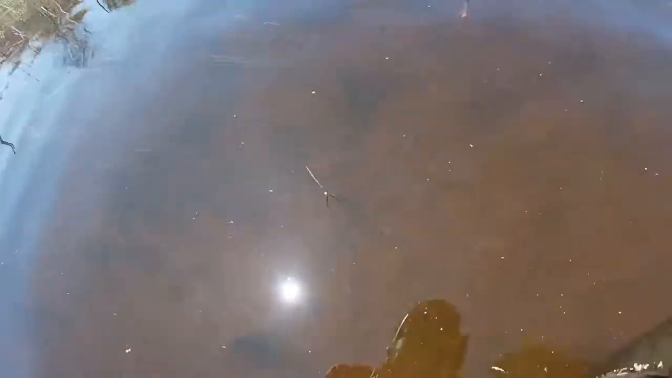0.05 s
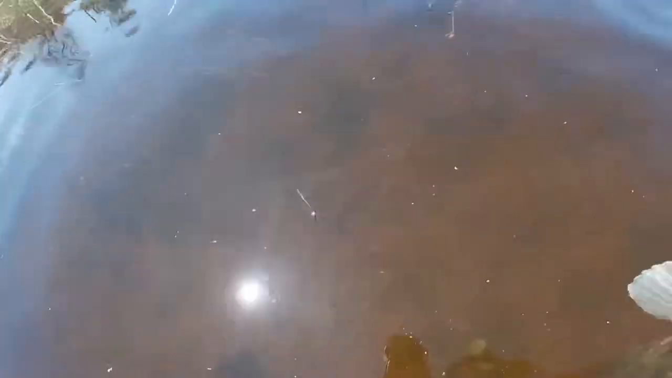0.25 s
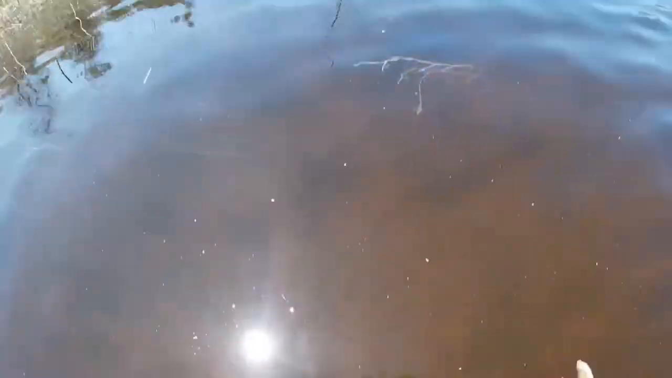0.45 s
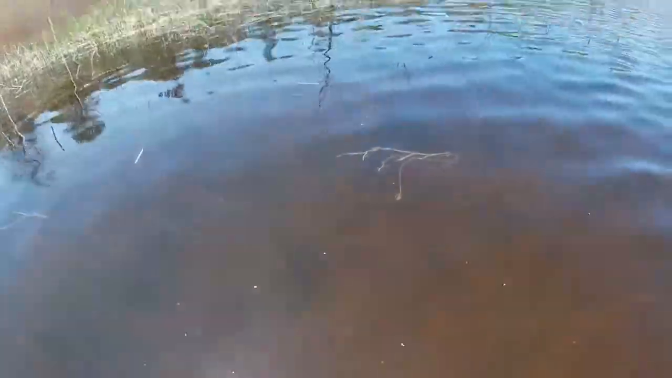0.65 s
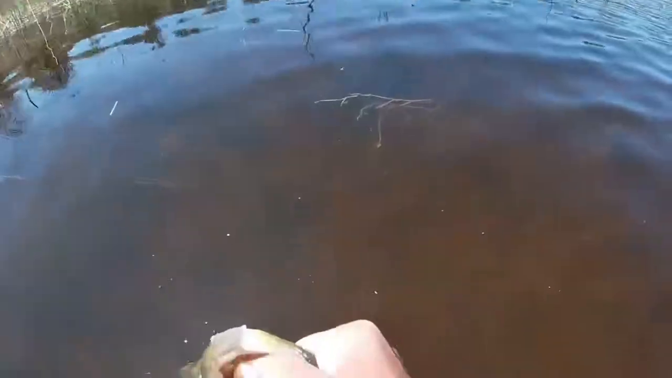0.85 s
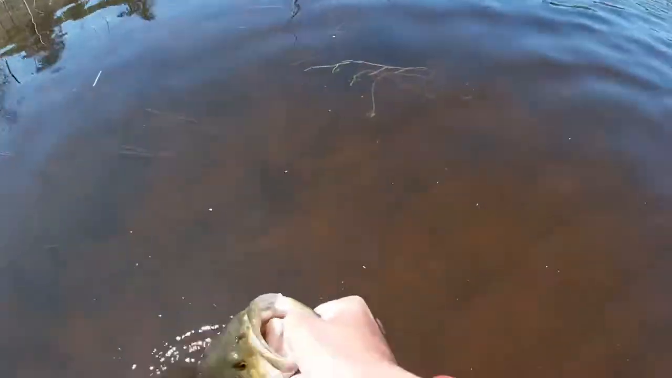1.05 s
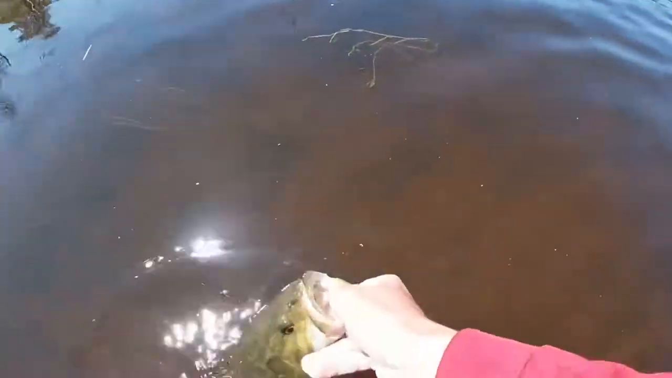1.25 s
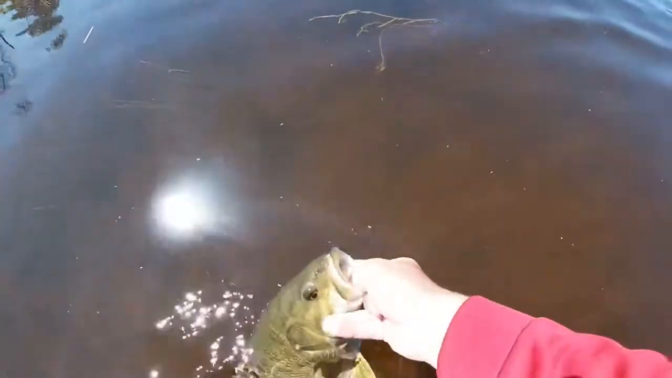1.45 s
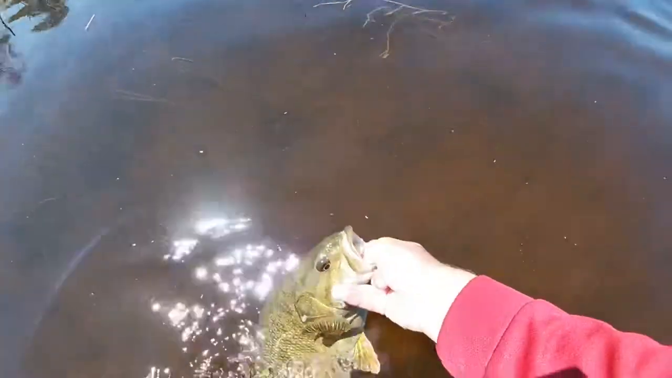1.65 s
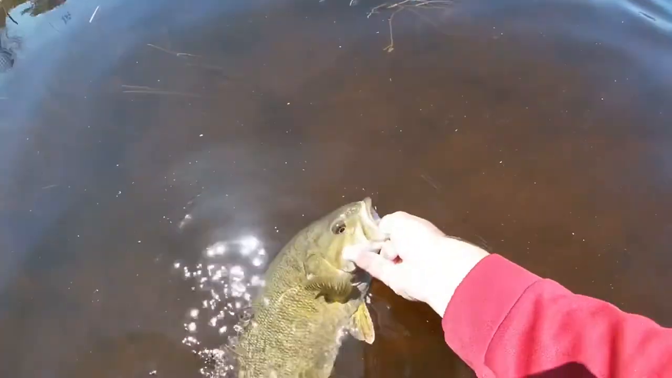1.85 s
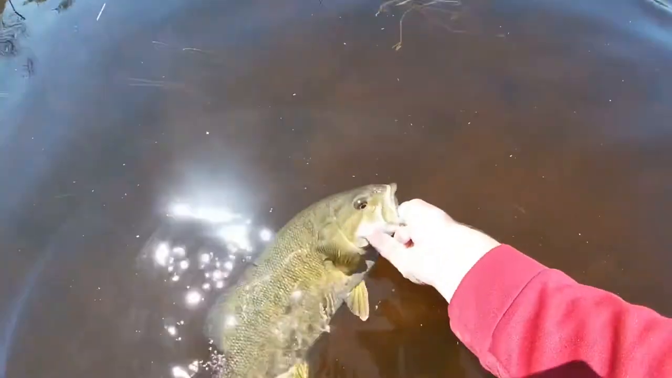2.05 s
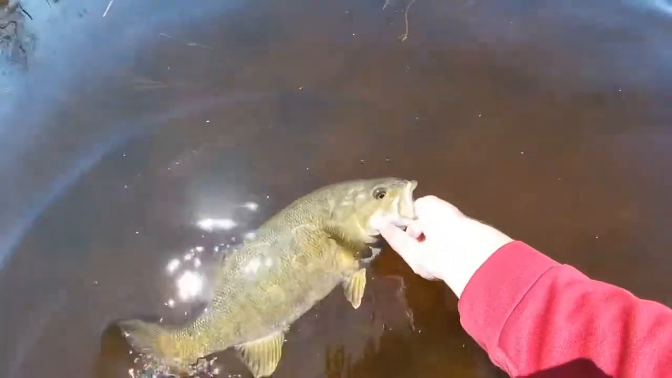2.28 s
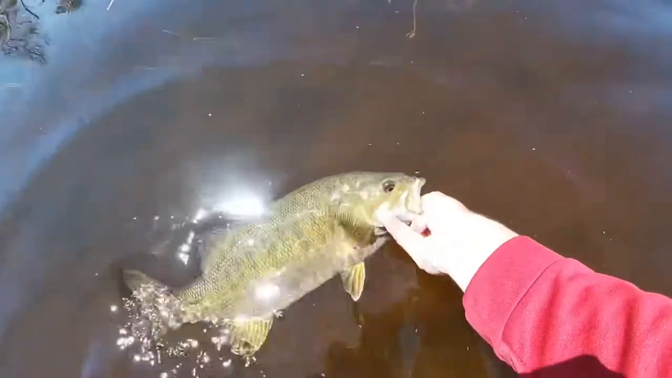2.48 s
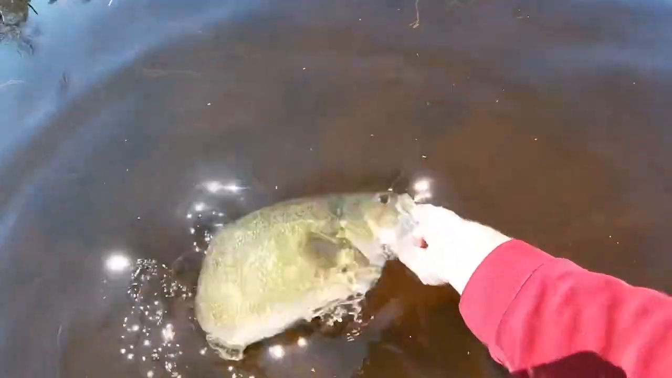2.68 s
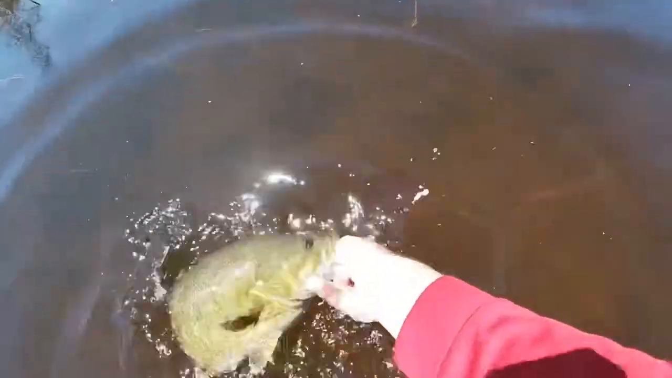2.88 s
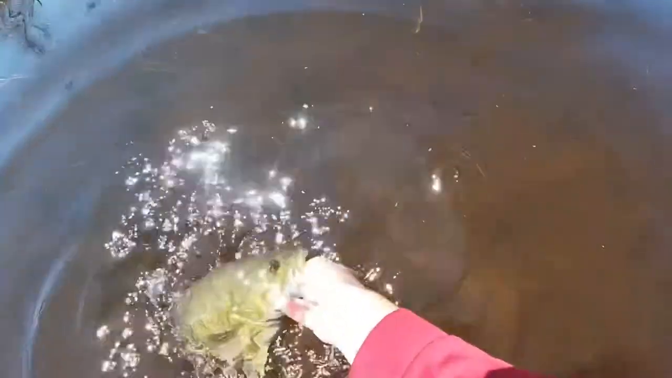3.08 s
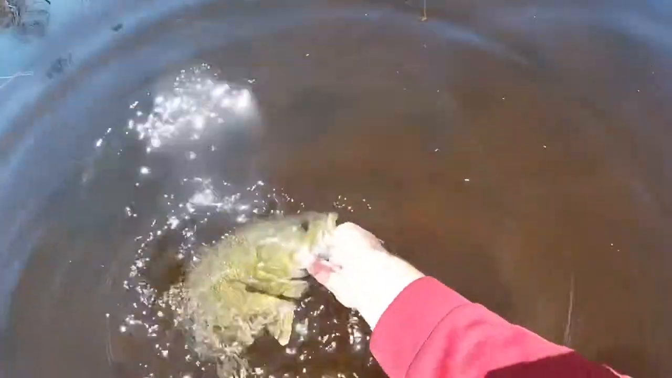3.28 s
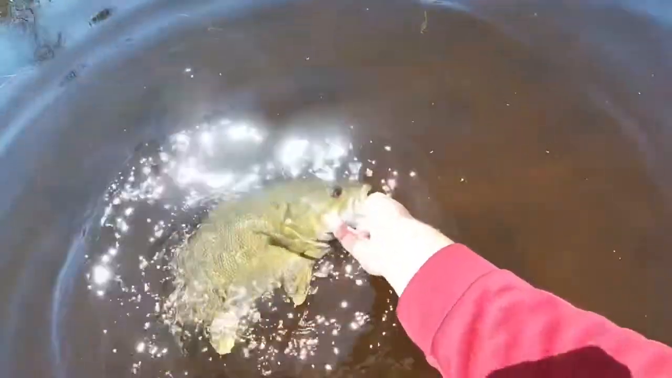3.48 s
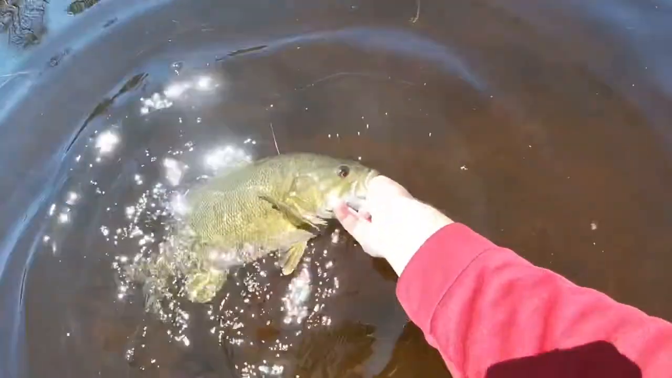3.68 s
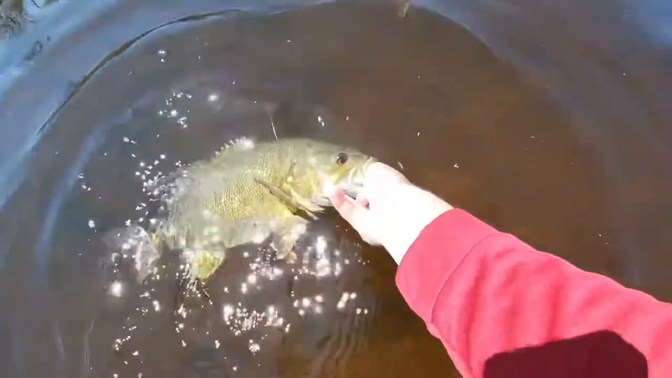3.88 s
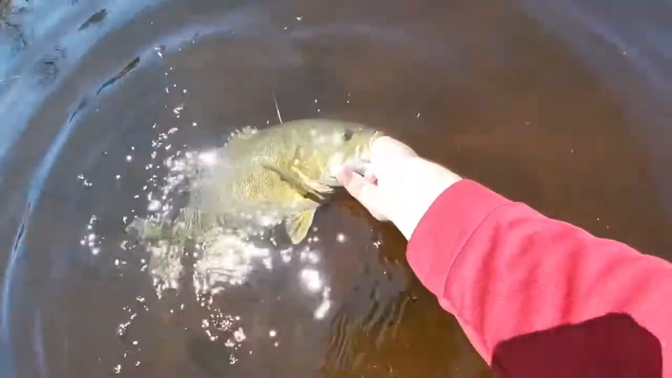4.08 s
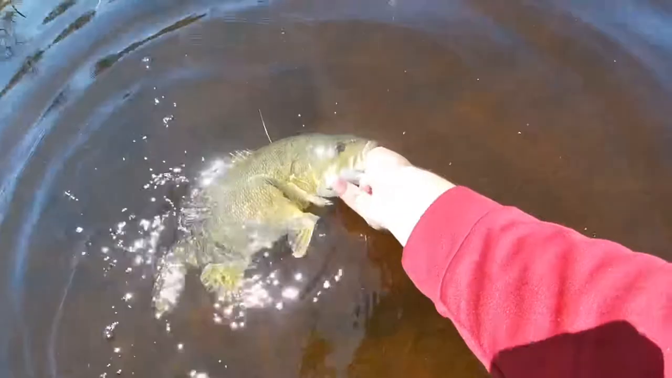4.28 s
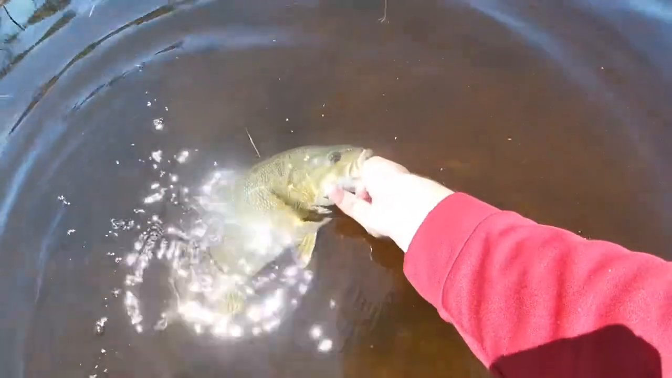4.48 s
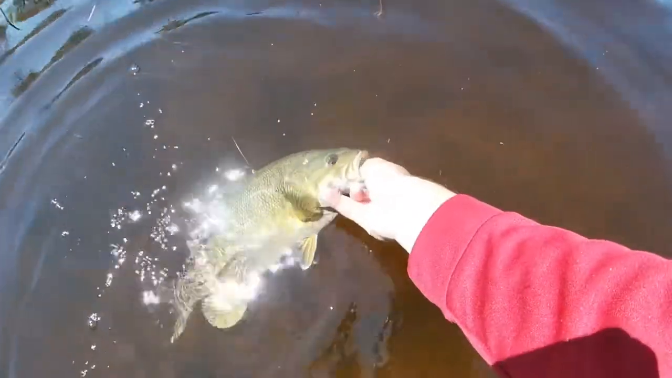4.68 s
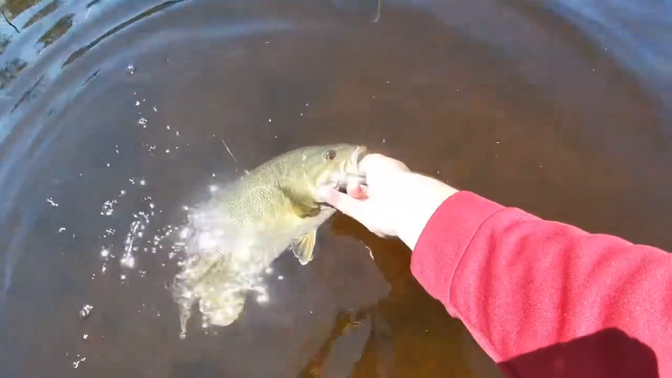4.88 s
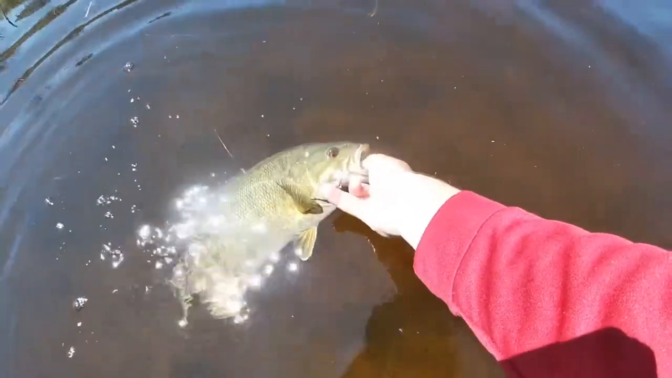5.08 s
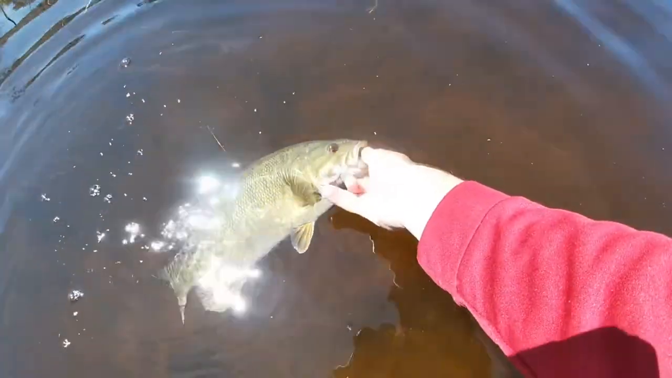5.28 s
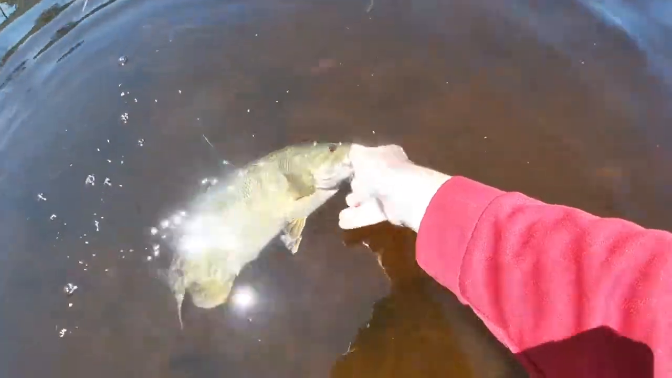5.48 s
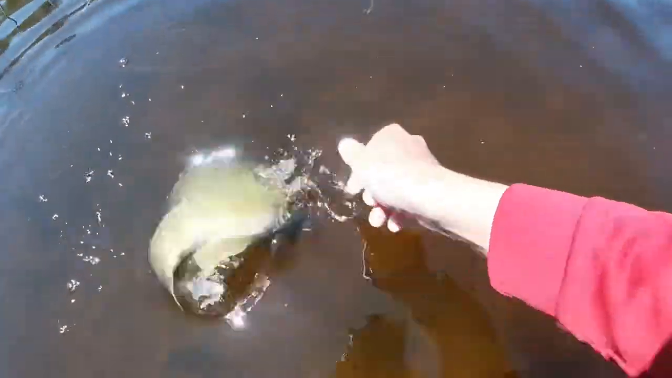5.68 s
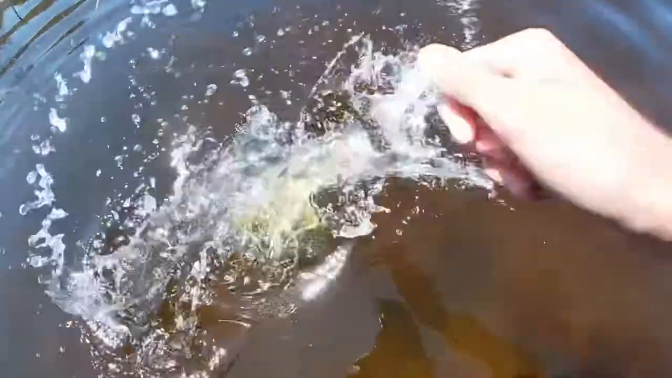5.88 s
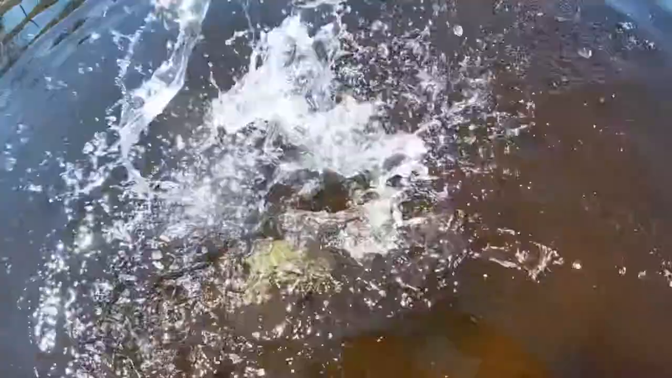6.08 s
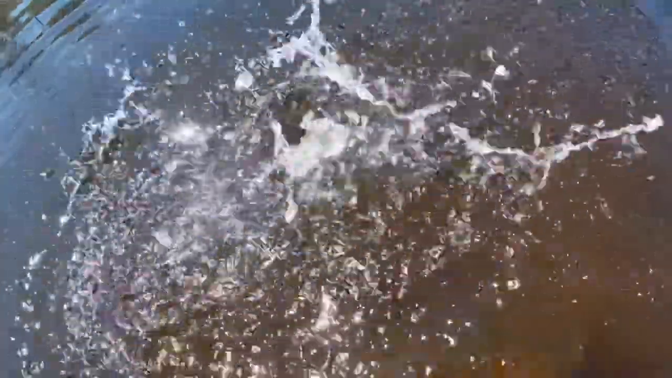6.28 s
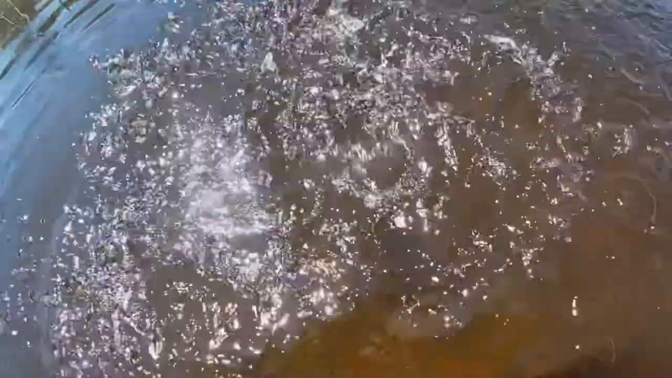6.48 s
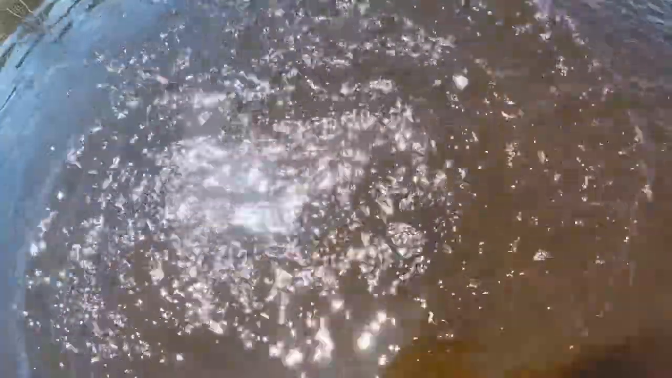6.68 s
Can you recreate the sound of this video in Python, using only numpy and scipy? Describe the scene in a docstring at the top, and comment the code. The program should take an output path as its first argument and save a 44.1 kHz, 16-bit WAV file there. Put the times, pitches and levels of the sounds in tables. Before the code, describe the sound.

Close, dry outdoor sound from a microphone worn on the body. Sharp plasticky knocks and cloth scraping open it, then low wind and a few tiny drips and bubbles. A fish slaps the water once with a short gurgle. After a pause come rustles, dull thuds and a faint falling whine, then calm, and finally a violent splash with dense spray, bubbles and pattering drops.

```python
"""Water: a fish held in the shallows beside a small boat stirs it, then bolts with a splash.
Slaps are noise bursts; air pockets are decaying sines, most gliding upward as they surface; spray is a
swarm of small bubbles plus clicks. Clothing rubs and knocks ring the case modes of a body-worn microphone.
Dull bumps are damped sines; wind and air are coloured noise; a groan and a thin whine are wavering tones."""
import sys
import numpy as np
from scipy import signal
from scipy.fft import rfft, irfft
from scipy.io import wavfile
from scipy.ndimage import uniform_filter1d

SR = 44100
rng = np.random.default_rng(int(sys.argv[2]) if len(sys.argv) > 2 else 0)


def transcribe(u):
    """Save the signal u as a 16-bit wav file named by the first command-line argument.

    u: samples, shape (n,) or (channels, n), limited to [-1, 1]; the rate is SR.
    q: integer samples, one column per channel.
    """
    v = np.clip(np.atleast_2d(u).T, -1, 1)
    q = np.round(v * 32767).astype(np.int16)
    wavfile.write(sys.argv[1], SR, q)


N = 297234
TIME = np.arange(N) / SR
CONTROL_TIME = TIME[::16]   # coarse grid for level curves
CUTOFF_HZ = 15500

# knocks on the case: (time [s], level [dB])
KNOCKS = [(.004, -17), (0.0529, -1.5), (0.074, -15), (0.199, -3.5), (3.632, -11), (3.771, -26.5),
          (3.927, -24.5), (4.241, -26)]
# case modes: (frequency [Hz], level [dB], t60 [s])
CASE_MODES = [(1195, -13, 0.075), (1269, 2, 0.035), (1340, -5.5, 0.015), (1678, -11, 0.048),
              (2950, -10.5, 0.02), (3060, -12, 0.026), (3780, -13, 0.027), (3776, -13, 0.018),
              (6630, -1, 0.0018), (8100, -18, 0.0079)]
CASE_WANDER, CASE_WANDER_PER_S = 0.046, 60   # shifting pressure detunes each mode by this share
# cloth sliding over the case: (time [s], hold [s], level [dB], fall on letting go [dB/s])
RUBS = [(0, 0.0096, -36.5, 257), (0.112, 0.076, -42.5, 600), (0.216, 0.12, -57, 80),
        (3.522, 0.23, -63, 120), (3.597, 0.11, -49.5, 87), (3.879, 0.013, -48.5, 129),
        (4.147, 0.097, -57, 302), (6.46, 0.019, -39.5, 215), (6.531, 0.017, -37, 4000),
        (6.687, 0.037, -47, 195)]
RUB_RISE_DB_PER_S = 252
# quick bright swishes of cloth: (time [s], level [dB], length [s])
SWISHES = [(3.589, -32, 0.025), (3.626, -34.5, 0.058), (4.127, -23, 0.028), (6.529, -20.5, 0.02)]
SWISH_HZ = 7000
# cloth spectrum: (frequency [Hz], relative level [dB per Hz])
CLOTH_COLOUR = [(900, -34), (1270, 1), (2150, -21), (3000, -6.5), (4400, -8), (5200, -17), (6800, -9),
                (7600, -4.5), (8600, -11), (12500, -35)]
GROAN_HZ, GROAN_DB, GROAN_UNTIL_S, GROAN_FALL_DB_PER_S = 528, -38.5, .2, 298.5

# gusts over a light breeze: (time [s], level [dB], half-width to 1/e of power [s])
GUSTS = [(.1, -41.5, 1.7), (2.251, -38.5, 0.08), (4.047, -39, 0.21), (5.851, -35.5, 0.18), (6.5, -38, 0.17)]
BREEZE_DB = -51
# wind spectrum: (frequency [Hz], relative level [dB per Hz])
WIND_COLOUR = [(20, 8), (60, 0.5), (170, -7.5), (300, -21), (600, -48)]
# background hiss spectrum: (frequency [Hz], relative level [dB per Hz])
AIR_COLOUR = [(350, -14.5), (800, -9), (980, -18), (1280, -11.5), (2100, -22.5), (7800, -20),
              (10500, -36.5), (15000, -67)]
AIR_DB, AIR_FLICKER_DB = -66, 3.2

# water stirred by the fish or its falling spray: (time [s], hold [s], gurgle level [dB], spray level [dB])
STIRS = [(0.937, 0.17, -64, -58.5), (1.08, 0.29, -50, -58), (2.701, 0.09, -56, -65.5),
         (2.795, 0.15, -32.5, -39.5), (3.079, 0.046, -43, -55.5), (5.665, 0.064, -40, -40),
         (5.793, 0.097, -43, -38), (5.9, 0.023, -33, -31.5), (5.975, 0.15, -30.5, -32.5),
         (6.168, 0.06, -32, -28.5), (6.332, 0.13, -37, -31)]
STIR_RISE_DB_PER_S, GURGLE_FALL_DB_PER_S, SPRAY_FALL_DB_PER_S = 1514, 200.5, 143.5
DRIPS_DB, DRIPS_FALL_DB_PER_S = -11, 41.5   # stray drops outlast each stir; level relative to its spray
CALM_GURGLE_DB, CALM_SPRAY_DB = -81, -82.5   # lapping in between
# spray spectrum: (frequency [Hz], relative level [dB per Hz])
WATER_COLOUR = [(300, -32.5), (700, -23.5), (1300, -0.5), (2250, -8), (3600, -5), (4800, -11), (7500, -8),
                (14000, -32.5)]
# lower edges of the octaves in which spray drops tick: (frequency [Hz])
DROP_OCTAVES_HZ = (900, 1800, 3600, 7200)
SINKING_SHARE = .25   # of the swarm's bubbles fall in pitch

# dull bumps on the boat and the wearer: (time [s], strength [dB], pitch [Hz])
BUMPS = [(0.205, -21.5, 110), (0.309, -33.5, 358), (.927, -35, 272), (1.337, -23.5, 107), (2.259, -25, 117),
         (2.35, -21.5, 111.5), (3.635, -13.5, 99.4), (3.66, -10.5, 128.5), (3.659, -21.5, 315),
         (3.929, -11, 49), (4.128, -7.5, 28.2), (4.191, -17.5, 110), (4.246, -19, 68.5), (5.709, -20, 166),
         (5.828, -20.5, 140), (6.688, -15.5, 96)]
BUMP_T60_S = 0.1   # at 100 Hz; deeper ones last longer
# soft hollow taps: (time [s], level [dB], length [s])
TAPS = [(2.242, -28, 0.017), (2.266, -42, 0.039), (2.334, -29, 0.015)]

# slaps of fish and thrown water on the surface: (time [s], level [dB], length [s])
SLAPS = [(1.21, -20, 0.0067), (2.795, -29.5, 0.009), (2.863, -11.5, .008), (5.666, -22.5, 0.007),
         (5.88, -15.5, 0.0075), (5.915, -10, 0.011), (5.961, -16, 0.0045), (6.008, -16.5, 0.018),
         (6.085, -12, 0.014), (6.106, -12, 0.0089), (6.163, -24.5, 0.0076), (6.4, -16, .012)]
SLAP_HZ = 3020
SLAP_GRAIN_DB, GRAINS_PER_S = 2, 1300   # a sheet of water lands in uneven pieces
# low sloshes as the tail shoves water aside: (time [s], level [dB], length [s])
SLOSHES = [(5.678, -27, .014), (5.831, -37, 0.083)]
SLOSH_HZ = 298
# short bright ticks, drops on the surface and one tick amid the rubbing at 3.731 s: (time [s], level [dB])
TICKS = [(1.074, -25), (1.368, -33.5), (3.731, -20.5), (6.602, -27.5), (6.666, -16)]
TICK_HZ, TICK_S = 7720, 0.0042
# single bubbles: (time [s], level [dB], starting pitch [Hz], t60 [s])
BUBBLES = [(1.076, -32.5, 743, 0.047), (1.153, -40, 873, 0.18), (1.235, -37, 372.4, 0.37),
           (1.281, -32, 1700, 0.028), (1.405, -39, 358, 0.34), (1.407, -33.5, 742, 0.12),
           (2.822, -20.5, 641, 0.13), (2.824, -12.5, 2720, 0.013), (2.903, -15.5, 1130, 0.02),
           (2.977, -21.5, 240, 0.4), (2.994, -18.5, 1036, 0.049), (3.1, -25.5, 1180, 0.063),
           (3.097, -12, 220, 0.014), (5.6651, -11, 1060, 0.023), (5.666, -10.5, 744, 0.017),
           (5.709, -9.5, 1330, 0.0055), (5.746, -24, 281, 0.043), (5.767, -25, 815, 0.025),
           (5.84, -32.5, 624, 0.16), (5.899, -19.5, 715, 0.028), (5.904, -12, 1050, 0.017),
           (5.963, -20, 775, 0.06), (6.037, -5, 1253, 0.021), (6.341, -22, 1670, 0.053),
           (6.588, -40.5, 1480, 0.058)]
BUBBLE_RISE_OCTAVES = 0.41   # over each bubble's t60
# hollows opening with a falling plop: (time [s], level [dB])
PLOPS = [(1.213, -28)]
PLOP_HZ, PLOP_T60_S, PLOP_FALL_OCTAVES_PER_S = 2090, 0.12, 31
# hollows closing up: (end time [s], peak level [dB], start pitch [Hz], end pitch [Hz], length [s])
GLUGS = [(1.577, -42.5, 446, 2300, 0.092), (3.03, -30, 1095, 1532, 0.046),
         (3.162, -32.5, 277.5, 810, 0.075), (3.181, -29.5, 334, 1527, 0.12), (5.426, -58, 2560, 3130, 0.18),
         (5.769, -27.5, 1357, 2010, 0.029), (6.031, -17.5, 2890, 4000, 0.015)]

# thin falling whine: (time [s], pitch [Hz], level [dB])
WHINE = [(4.14, 4480, -100), (4.18, 4290, -59), (4.41, 3760, -56.5), (4.8, 3670, -68), (5.3, 3680, -105)]


def from_db(db):
    """Decibels to gain."""
    return 10 ** (np.asarray(db) / 20)


def in_db(power):
    """A control-rate power curve in decibels, at every sample."""
    return np.interp(TIME, CONTROL_TIME, 10 * np.log10(power + 1e-12))


def rms_one(x):
    """Scale to unit power."""
    return x / np.sqrt(np.mean(x ** 2) + 1e-20)


def in_time(rows):
    """Each column of a curve at every sample."""
    s, *columns = np.transpose(rows)
    return [np.interp(TIME, s, c) for c in columns]


def add(out, s, sound):
    """Mix a sound in at a time."""
    i = int(np.clip(s * SR, 0, N - 1))
    out[i:i + len(sound)] += sound[:N - i]


def band(x, low_hz, high_hz, order=2):
    """Butterworth band-pass; an inaudible ripple keeps it quick through silences."""
    ripple = 1e-18 * (np.arange(len(x)) % 3)
    edges_hz = [low_hz, min(high_hz, SR / 2 - 500)]
    sos = signal.butter(order, edges_hz, "band", fs=SR, output="sos")
    return signal.sosfilt(sos, x + ripple)


def coloured(x, spectrum):
    """Give a signal a smooth spectrum, falling away steeply past its ends; rms 1."""
    hz, db = np.transpose(spectrum)
    f = np.maximum(np.arange(N // 2 + 1) * SR / N, 1)
    ends = np.minimum(f / hz[0], 1) ** 2 * np.minimum(hz[-1] / f, 1) ** 2
    gain = ends * from_db(np.interp(np.log(f), np.log(hz), db))
    return rms_one(irfft(rfft(x) * gain, N))


def drift(rate_per_s):
    """Random wander: straight lines between unit-normal points."""
    return np.interp(TIME * rate_per_s, np.arange(N), rng.standard_normal(N))


def evened(x, window_s):
    """Hold a dense texture's short-term power near 1; lone grains keep their gaps."""
    power = np.maximum(uniform_filter1d(x ** 2, int(window_s * SR)), 0)
    return x / np.sqrt(power + 0.013 * np.mean(x ** 2))


def swell(s, hold_s, db, rise_db_per_s, fall_db_per_s):
    """Power of a sound that rises until a time, holds and dies away."""
    t = CONTROL_TIME - s
    level_db = db - rise_db_per_s * np.maximum(-t, 0) - fall_db_per_s * np.maximum(t - hold_s, 0)
    return from_db(np.maximum(level_db, -150)) ** 2


def crackle(per_s, spread_db):
    """Tiny clicks of very uneven size."""
    sizes = from_db(spread_db * np.minimum(rng.exponential(1, N), 4))
    hits = rng.random(N) < per_s / SR
    return rms_one(hits * sizes * rng.standard_normal(N))


def burst(db, hz, length_s, width, grain_db=0):
    """A short swell of band noise, smooth or grainy."""
    u = np.arange(int(6 * length_s * SR)) / (length_s * SR)
    white, grains = rng.standard_normal((2, len(u)))
    grain = np.interp(u * length_s * GRAINS_PER_S, np.arange(len(u)), grains)
    noise = rms_one(band(white * from_db(grain_db * grain), hz / width, hz * width, order=1))
    return from_db(db + 7) * noise * 2.23 * u * np.exp(-3.2 * u)


def bubble(hz, t60_s, rise_octaves_per_s, attack_s, wobble=0):
    """A trapped air pocket: a decaying sine that can glide and wobble in pitch."""
    t = np.arange(int(t60_s * SR) + 2) / SR
    pitch_hz = np.minimum(hz * 2 ** (rise_octaves_per_s * t), CUTOFF_HZ)
    if wobble:
        pitch_hz = pitch_hz * (1 + wobble * drift(hz / 4)[:len(t)])
    envelope = np.exp(-np.log(1000) * t / t60_s) * (1 - np.exp(-t / attack_s))
    return np.sin(2 * np.pi * np.cumsum(pitch_hz) / SR) * envelope


def case(force):
    """The microphone case rings in its modes, each wandering a little in pitch."""
    out = np.zeros(N)
    for hz, db, t60_s in CASE_MODES:
        pitch_hz = hz * (1 + CASE_WANDER * drift(CASE_WANDER_PER_S))
        turn = np.exp(2j * np.pi * np.cumsum(pitch_hz) / SR)
        r = np.exp(-np.log(1000) / (t60_s * SR))
        # one-pole decay in the frame rotating with the mode
        ring = turn * signal.lfilter([1], [1, -r], (force + 1e-18) * turn.conj())
        out += from_db(db) * np.imag(ring)
    return out


def handling():
    """Light rubbing mostly hisses; firm rubbing and knocks make the case ring too."""
    knocks, direct, swishes = np.zeros(N), np.zeros(N), np.zeros(N)
    for s, db in KNOCKS:
        add(knocks, s, from_db([db - 13.0]))   # one-sample impulse
        add(direct, s, burst(db - 8.5, 2800, 0.0028, width=1.1))
    for s, db, length_s in SWISHES:
        add(swishes, s, burst(db, SWISH_HZ, length_s, width=1.247))
    rustle = np.std(swishes) * coloured(swishes, CLOTH_COLOUR)   # part of each swish in the cloth's colour

    rub_db = in_db(sum(swell(s, hold_s, db, RUB_RISE_DB_PER_S, fall) for s, hold_s, db, fall in RUBS))
    grit = evened(crackle(per_s=2600, spread_db=-1.5), 0.0036)
    catching_db = 4 * drift(90)
    grind_db = 2 * rub_db + 46.5 + catching_db   # grows with the square of the pressure
    grind = from_db(grind_db) * rms_one(band(case(grit), 1100, 7500))
    hiss_db = np.minimum(rub_db, -45) + .5 * catching_db   # levels off once the cloth grips
    hiss = from_db(hiss_db) * coloured(grit, CLOTH_COLOUR)
    return band(case(knocks) + direct + swishes, 170, 8200, order=4) + grind + rustle + hiss


def groan():
    """A low, uneven tone under the first hard rubbing, then dying away."""
    level_db = GROAN_DB - GROAN_FALL_DB_PER_S * np.maximum(TIME - GROAN_UNTIL_S, 0)
    strength = from_db(level_db) * (1 + .5 * drift(90))
    pitch_hz = GROAN_HZ * (1 + .025 * drift(200))
    return strength * np.sin(2 * np.pi * np.cumsum(pitch_hz) / SR)


def outdoors():
    """Lumpy low wind noise on the microphone port, and a faint hiss that swells a little with it."""
    power = from_db(BREEZE_DB) ** 2
    for s, db, width_s in GUSTS:
        power = power + from_db(db) ** 2 * np.exp(-((CONTROL_TIME - s) / width_s) ** 2)
    wind_db = in_db(power)
    wind = coloured(rng.standard_normal(N) * from_db(1.6 * drift(14)), WIND_COLOUR)
    air = coloured(rng.standard_normal(N) * from_db(AIR_FLICKER_DB * drift(62)), AIR_COLOUR)
    air_db = AIR_DB + 0.6 * (wind_db - wind_db.mean())
    return from_db(wind_db) * wind + from_db(air_db) * air


def stirring():
    """Gurgle and spray levels [dB]: each stir rises fast, holds, falls and leaves stray drops."""
    gurgle, spray = from_db(CALM_GURGLE_DB) ** 2, from_db(CALM_SPRAY_DB) ** 2
    for s, hold_s, gurgle_db, spray_db in STIRS:
        gurgle = gurgle + swell(s, hold_s, gurgle_db, STIR_RISE_DB_PER_S, GURGLE_FALL_DB_PER_S)
        spray = spray + swell(s, hold_s, spray_db, STIR_RISE_DB_PER_S, SPRAY_FALL_DB_PER_S)
        spray = spray + swell(s, hold_s, spray_db + DRIPS_DB, STIR_RISE_DB_PER_S, DRIPS_FALL_DB_PER_S)
    return in_db(gurgle), in_db(spray)


def swarm(busy, per_s, low_hz, high_hz, cycles, spread_db, octaves):
    """Bubbles, most of middle size, each ringing some cycles and gliding part of an octave, usually up."""
    out = np.zeros(N)
    for when, luck, size, other, strength, life, lift in rng.random((int(per_s * N / SR), 7)):
        if luck < busy[int(when * N)]:
            hz = low_hz * (high_hz / low_hz) ** ((size + other) / 2)
            t60_s = cycles * 2 ** (2 * life - 1) / hz
            rise = octaves * (lift - SINKING_SHARE) / t60_s
            gain = from_db(-spread_db * np.log(strength + 0.074))
            add(out, when * N / SR, gain * bubble(hz, t60_s, rise, 12.0 / hz))
    return out


def churn():
    """Big bubbles gurgle; drops add small bubbles and a crackle of impacts of fluctuating level."""
    gurgle_db, spray_db = stirring()
    # gentle water gives a few distinct drops, thrashing a dense spray
    busy = np.clip(from_db(.75 * (spray_db + 36)), .04, 1)
    gurgle = swarm(busy, per_s=1000, low_hz=522, high_hz=2690, cycles=19, spread_db=6.5, octaves=0.22)
    fizz = swarm(busy, per_s=2000, low_hz=1800, high_hz=9780, cycles=26, spread_db=4.6, octaves=.35)
    impacts = np.zeros(N)
    for hz in DROP_OCTAVES_HZ:   # each size of drop ticks in its own octave
        impacts += band(crackle(per_s=4500 * busy, spread_db=5.0), hz, 2 * hz, order=4)
    # gentle drops trap little air
    drops = coloured(np.sqrt(busy) * rms_one(fizz) + rms_one(impacts), WATER_COLOUR)
    spray = from_db(spray_db + drift(90)) * evened(drops, 0.31)
    return from_db(gurgle_db) * evened(gurgle, 0.035) + spray


def bumps():
    """Low, quickly damped thuds, and band-limited noise taps without treble."""
    thuds, taps = np.zeros(N), np.zeros(N)
    for s, db, hz in BUMPS:
        t60_s = BUMP_T60_S * np.sqrt(100 / hz)
        add(thuds, s, from_db(db) * bubble(hz, t60_s, 0, attack_s=0.0012))
    for s, db, length_s in TAPS:
        add(taps, s, burst(db, 700, length_s, width=1.16))
    return thuds + band(taps, 270, 3100, order=4)


def air_pockets():
    """Bubbles ring and rise, opening hollows plop downward, closing hollows glide upward."""
    rings = np.zeros(N)
    for s, db, hz, t60_s in BUBBLES:
        rise = BUBBLE_RISE_OCTAVES / t60_s
        add(rings, s, from_db(db) * bubble(hz, t60_s, rise, attack_s=0.00026, wobble=0.05))
    for s, db in PLOPS:
        plop = bubble(PLOP_HZ, PLOP_T60_S, -PLOP_FALL_OCTAVES_PER_S, attack_s=0.00055)
        add(rings, s, from_db(db) * plop)
    for end_s, db, start_hz, end_hz, length_s in GLUGS:
        u = np.linspace(0, 1, int(length_s * SR))
        pitch_hz = start_hz * (end_hz / start_hz) ** (u ** 2)   # the shrinking hollow climbs ever faster
        pitch_hz = pitch_hz * (1 + .09 * drift(500)[:len(u)])
        tone = np.sin(2 * np.pi * np.cumsum(pitch_hz) / SR)
        add(rings, end_s - length_s, from_db(db) * np.sin(np.pi * u ** 2.18) * tone)
    return rings


def slaps_and_ticks():
    """Water slaps, low sloshes and short bright ticks, all as brief noise bursts."""
    out = np.zeros(N)
    for s, db, length_s in SLAPS:
        add(out, s, burst(db, SLAP_HZ, length_s, width=1.64, grain_db=SLAP_GRAIN_DB))
    for s, db, length_s in SLOSHES:
        add(out, s, burst(db, SLOSH_HZ, length_s, width=1.5))
    for s, db in TICKS:
        add(out, s, burst(db, TICK_HZ, TICK_S, width=1.08))
    return band(out, 115.4, 6050)


def whine():
    """A wavering tone sinks and settles, with a breathier band just above it."""
    hz, db = in_time(WHINE)
    phase = 2 * np.pi * np.cumsum(hz) / SR
    return from_db(db) * (drift(170) * np.sin(phase) + drift(660) * np.sin(1.07 * phase))


def scene():
    """Everything close and dry, the same in both channels."""
    water = churn() + air_pockets() + slaps_and_ticks()
    mono = handling() + groan() + outdoors() + bumps() + water + whine()
    return np.array([mono, mono])


def record(dry):
    """Steep elliptic low-pass."""
    return signal.sosfilt(signal.ellip(10, .1, 80, CUTOFF_HZ, fs=SR, output="sos"), dry)


dry = scene()
out = record(dry)
transcribe(out)
```